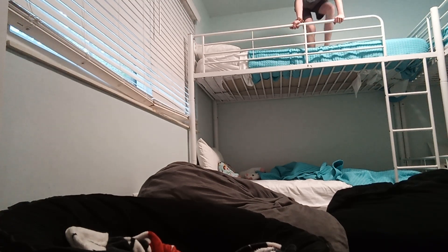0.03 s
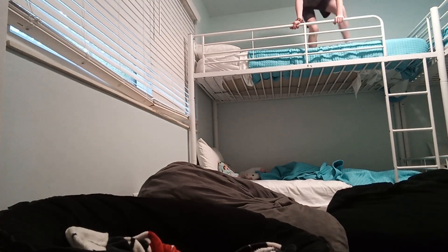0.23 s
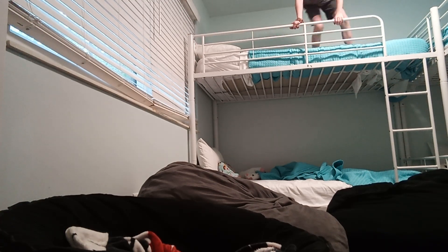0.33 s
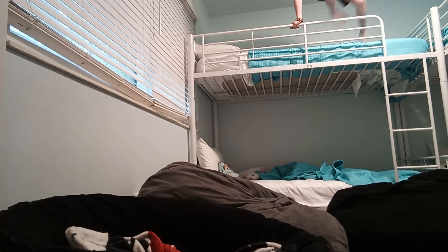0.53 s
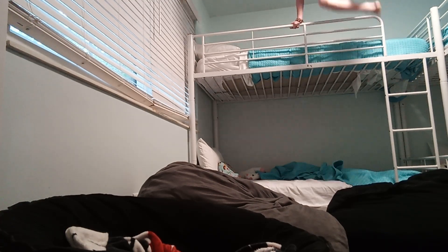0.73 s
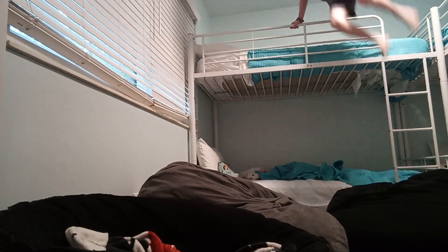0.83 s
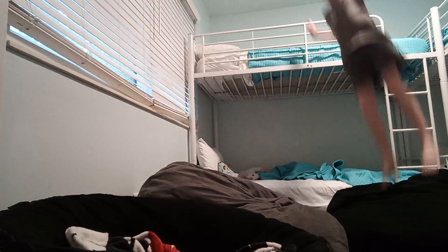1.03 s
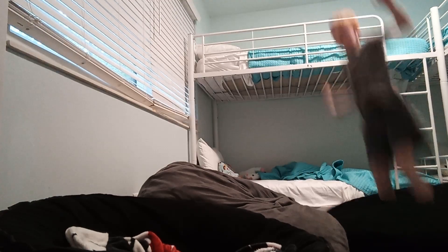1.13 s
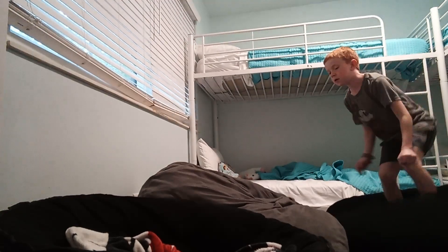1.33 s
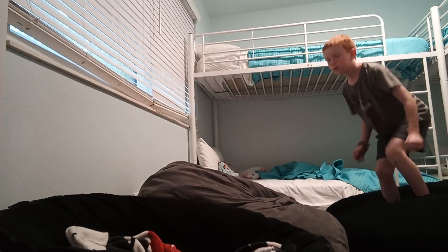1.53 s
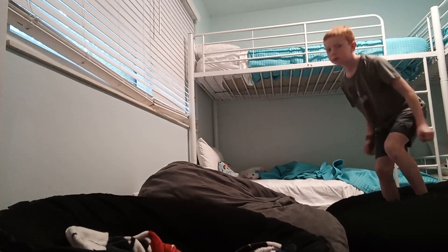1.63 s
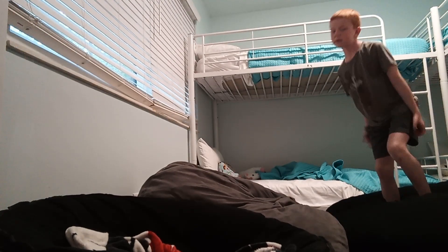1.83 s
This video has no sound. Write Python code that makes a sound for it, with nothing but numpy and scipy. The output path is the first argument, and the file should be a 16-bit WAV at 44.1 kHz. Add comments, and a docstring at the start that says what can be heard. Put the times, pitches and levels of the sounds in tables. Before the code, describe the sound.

Metal bunk bed clacks and rattles as a child jumps off and thumps onto a beanbag

```python
"""A steel bunk bed: a child pushes off the top; slipping joints clack in runs of ticks and ring the tubes.
The bed sways with a low boom and the bedding rustles as noise grains under level curves.
The child lands on a beanbag and shifts on it: soft pulses through resonances thump, the filling crunches,
the floor rumbles, the cover swishes and snaps once (a run of ticks too), narrow noise bands squeak.
A small bedroom answers; a low hum sinks, then partly returns, over faint room tone."""
import sys
import numpy as np
from scipy import signal
from scipy.fft import rfft, irfft, next_fast_len
from scipy.io import wavfile

SR = 44100
rng = np.random.default_rng(int(sys.argv[2]) if len(sys.argv) > 2 else 0)


def digitize_waveform(pressure):
    """Quantize a signal to 16-bit integers and store it at the path in sys.argv[1].

    Rows of a 2-D input are taken as channels; values are limited to [-1, 1].
    """
    field = np.atleast_2d(pressure).T
    bounded = np.clip(field, -1, 1)
    quanta = np.round(bounded * 32767).astype(np.int16)
    wavfile.write(sys.argv[1], SR, quanta)


N = 83790

BODY_WET_DB, TREBLE_WET_DB = 9.5, 5  # reverberation against direct clack
BODY_BLOOM_S = 0.0028  # the lower part of a clack arrives mostly by way of the walls


def amp(db):
    """Decibels to gain."""
    return 10 ** (np.asarray(db) / 20)


def unit(x):
    """Scale to rms 1."""
    return x / np.sqrt(np.mean(x ** 2) + 1e-20)


def burst(x):
    """Scale to the energy of 20 ms at rms 1."""
    return x * np.sqrt(SR / 50 / (np.sum(x ** 2) + 1e-20))


def clock():
    """Time of each sample [s]."""
    return np.arange(N) / SR


def along(points, hz):
    """Interpolate (frequency [Hz], value) points on a log frequency axis."""
    point_hz, values = np.transpose(points)
    return np.interp(np.log(hz + 1), np.log(point_hz + 1), values)


def level(points):
    """Gain per sample from (time [s], level [dB]) points."""
    return amp(np.interp(clock(), *np.transpose(points)))


def filtered(x, response):
    """Multiply the spectrum of x by a response of frequency [Hz]."""
    size = 2 * next_fast_len(N * 3 // 4)  # zero-padded against wrap-around
    spectrum = rfft(x, size) * response(np.fft.rfftfreq(size, 1 / SR))
    return irfft(spectrum, size)[:N]


def colour(x, points):
    """Minimum-phase filter through (frequency [Hz], gain [dB]) points."""
    def response(hz):
        cepstrum = irfft(np.log(amp(along(points, hz))))
        half = len(cepstrum) // 2
        cepstrum[1:half] *= 2  # fold to the causal side
        cepstrum[half + 1:] = 0
        return np.exp(rfft(cepstrum))
    return filtered(x, response)


def resonate(x, peaks):
    """Parallel resonances (frequency [Hz], width [Hz], gain [dB])."""
    def response(f):
        return sum(amp(db) * 1j * f * width / (hz * hz - f * f + 1j * f * width)
                   for hz, width, db in peaks)
    return filtered(x, response)


def add(out, start_s, x):
    """Mix x in from start_s."""
    part = out[round(start_s * SR):][:len(x)]
    part += x[:len(part)]


def grains(per_s, spread_db, size=N):
    """Random tiny slips of uneven size, rms 1."""
    hits = rng.random(size) < per_s / SR
    sizes = rng.standard_normal(size) * amp(spread_db * rng.standard_normal(size))
    return unit(hits * sizes)


def swell(peak_s, rise_s, t60_s):
    """Rise by 20 dB in rise_s up to peak_s, then decay by 60 dB per t60_s."""
    t = clock() - peak_s
    return amp(np.minimum(20 * t / rise_s, -60 * t / t60_s))


def clacks():
    """Joints slip, and at 1.252 s the bag's cover snaps: tick runs with knock, resonances and tube ring."""
    # joint slips, and at 1.252 s a snap of the bag's cover: (time [s], level before part gains [dB],
    # treble against body [dB], decay constant of the ticks [s], knock pitch [Hz])
    clack_rows = [(0.2143, -28.5, 2, 0.0036, 3030), (0.382, -39.5, 1, 0.0095, 3300),
                  (0.3872, -41, 10.5, 0.0017, 3260), (0.6237, -32, 3.5, .004, 3290),
                  (0.836, -53, -9.5, 0.0033, 2370), (0.883, -49.5, 6.5, 0.012, 3250),
                  (.964, -53.5, -5.5, 0.011, 1750), (1.12, -62, 9, .008, 2690),
                  (1.252, -53, 8, 0.0055, 2660), (1.36, -71.5, 11.5, 0.013, 3000)]
    # spectra of the clack's lower and upper parts: (frequency [Hz], gain [dB])
    body_shape = [(300, -28), (750, -12), (1400, -5), (2050, -4), (2450, -5), (3100, 1), (4200, -4),
                  (5800, -6), (8000, -22.5), (16000, -16)]
    treble_shape = [(3000, -22.5), (6000, -7.5), (7700, -3.5), (9000, -8), (10300, 2), (12000, -5.5),
                    (15800, -13)]
    # joint resonances: (frequency [Hz], width [Hz], gain [dB])
    joint_peaks = [(1570, 20, -9), (2727, 22, -7), (3025, 60, -4), (3600, 25, -7), (6738, 30, -6),
                   (7455, 60, -2), (7850, 70, 1), (8588, 45, -2), (8815, 70, -6), (9225, 110, -4),
                   (9470, 90, -4)]
    body_db, treble_db, joint_db, tube_db, knock_db = -8.5, -9.5, -8, -19.5, -8
    knock_width_hz = 900

    body, treble, steel = np.zeros((3, N))
    tubes = amp(tube_db) * ring()
    for start_s, db, tilt_db, decay_s, knock_hz in clack_rows:
        low, high = amp(db - tilt_db / 2), amp(db + tilt_db / 2)
        add(body, start_s, low * tick_run(decay_s, BODY_WET_DB, BODY_BLOOM_S))
        add(treble, start_s, high * tick_run(decay_s, TREBLE_WET_DB, decay_s / 2))
        peak = signal.iirpeak(knock_hz, knock_hz / knock_width_hz, SR)
        knock = signal.lfilter(*peak, tick_run(decay_s, BODY_WET_DB, decay_s))
        add(steel, start_s, low * amp(knock_db) * burst(knock))
        add(steel, start_s, low * tubes)

    # each filtered part keeps the rms of its drive, times its gain
    low_part = amp(body_db) * unit(colour(body, body_shape)) * body.std()
    high_part = amp(treble_db) * unit(colour(treble, treble_shape)) * treble.std()
    clink = amp(joint_db) * unit(resonate(treble, joint_peaks)) * treble.std()
    return low_part + high_part + clink + steel


def tick_run(decay_s, wet_db, build_s):
    """A quick decaying run of ticks, its reverberation and the buzz of loose parts."""
    rattle_db, rattle_t60_s = -28, 0.32
    t = np.arange(SR // 2) / SR
    out = burst(grains(per_s=3800, spread_db=1, size=len(t)) * np.exp(-t / decay_s))
    add(out, 0, amp(wet_db) * burst(tail(build_s)))
    rattle = rng.standard_normal(len(t)) * amp(-60 * t / rattle_t60_s)
    return burst(out) + amp(rattle_db) * burst(rattle)


def ring():
    """The tubes' modes after one blow: decaying sines with a soft onset."""
    # tube modes: (frequency [Hz], level before tube gain [dB], t60 [s])
    tube_modes = [(790, -12, .35), (1348, -4, .6), (1569, 1, .28), (1680, -10, .5), (1836, -3, .25),
                  (2030, 0, .2), (2191, 0, .4), (2730, 1, .22), (2961, -1, .33), (3321, -9, .6),
                  (3595, 0, .35), (4300, -9, .33), (5535, -9, .65)]
    t = np.arange(SR) / SR
    modes = sum(amp(db - 60 * t / t60_s) * np.sin(2 * np.pi * (hz * t + rng.random()))
                for hz, db, t60_s in tube_modes)
    return modes * (1 - np.exp(-t / BODY_BLOOM_S))


def sway():
    """Each shift of weight rocks the whole bed on its feet with a low boom."""
    # shifts of weight: (time [s], level [dB])
    shifts = [(0.468, -60.5), (0.647, -60.5), (.83, -64)]
    sway_hz, rise_s, t60_s = 74, 0.03, 0.38
    t = clock()
    return sum(amp(db) * swell(s, rise_s, t60_s) * np.sqrt(2) * np.sin(2 * np.pi * sway_hz * (t - s))
               for s, db in shifts)


def thumps():
    """Feet and body push into the bag, each with one soft pulse through its resonances."""
    # pushes: (time [s], level before thump gain [dB], pulse length [s])
    pushes = [(1.12, -33, .0042), (1.127, -41.5, 0.0019), (1.1505, -30.5, 0.0029), (1.1597, -40.5, 0.0027),
              (1.168, -38.5, 0.00287), (1.1778, -42.5, 0.0039), (1.223, -54.5, 0.0052),
              (1.25, -47.5, 0.0046), (1.304, -68, 0.016), (1.382, -55.5, 0.0072), (1.476, -52, 0.0038)]
    # bag and floor: (frequency [Hz], width [Hz], gain [dB])
    bag_peaks = [(84.5, 13, -14), (121.3, 28, -4.5), (158.8, 40, 3.5), (223.6, 76, 3.5), (301, 79, -3),
                 (566, 46, -2), (705, 50, -16), (1010, 200, -25)]
    thump_db = -1.5
    t, out = clock(), np.zeros(N)
    for start_s, db, push_s in pushes:
        pulse = np.sin(np.pi * np.minimum(t / push_s, 1)) ** 2
        add(out, start_s, amp(db) * burst(resonate(pulse, bag_peaks)))
    return amp(thump_db) * room(out, wet_db=-4.5)


def filling():
    """Beads give way in grains under the load; the floor rumbles as swelling noise."""
    # pressure peaks: (time [s], level [dB], rise [s], t60 [s])
    crunches = [(1.122, -37.5, 0.028, 0.31), (1.227, -54.5, 0.052, 0.12), (1.565, -64.5, 0.081, 0.35)]
    # spectra of beads and floor: (frequency [Hz], gain [dB])
    bead_shape = [(25, -12), (60, -5.5), (150, -3.5), (280, 7), (420, -3.5), (620, 2), (850, -5),
                  (1200, -8), (2000, -25), (4000, -33), (9000, -55)]
    rumble_shape = [(20, -27), (37, 0), (60, -7), (115, -5.5), (180, -12.5), (400, -24.5), (1000, -39)]
    sag_s, sag_db, sag_rise_s, sag_t60_s = 1.218, -49, 0.18, 0.88

    pressure = sum(amp(db) * swell(s, rise_s, t60_s) for s, db, rise_s, t60_s in crunches)
    beads = pressure * unit(colour(grains(per_s=3100, spread_db=1.5), bead_shape))
    load = amp(sag_db) * swell(sag_s, sag_rise_s, sag_t60_s)
    rumble = load * unit(colour(rng.standard_normal(N), rumble_shape))
    return beads + rumble


def fabrics():
    """Mattress and clothes rub during the push-off, the bag's cover at the landing: dense grains."""
    # mattress and clothes, then cover: (time [s], level [dB])
    bedding_level = [(0, -88), (.1, -72), (.19, -74), (.35, -54.5), (.42, -55), (.47, -50), (.525, -61.5),
                     (.575, -50), (.62, -71), (.82, -105), (.86, -72.5), (1.0, -59.5), (1.08, -91),
                     (1.25, -100)]
    cover_level = [(1.08, -60.5), (1.125, -50), (1.17, -53), (1.225, -49), (1.27, -67.5), (1.32, -68.5),
                   (1.45, -68.5), (1.6, -68.5), (1.78, -72.5), (1.89, -67)]
    # their spectra: (frequency [Hz], gain [dB])
    cloth_shape = [(30, -19.5), (75, 7.5), (140, 4.5), (250, -1), (450, -0.5), (900, -4), (3200, -10.5),
                   (5500, -9), (8800, -9.5), (10500, -10.5), (15800, -10)]
    swish_shape = [(300, 6), (1200, 3.5), (2500, 1.5), (4500, -6), (6200, -12), (8900, -7.5), (11000, -12),
                   (15800, -3)]
    bedding = level(bedding_level) * unit(colour(grains(per_s=9000, spread_db=1), cloth_shape))
    cover = level(cover_level) * unit(colour(grains(per_s=5000, spread_db=-2), swish_shape))
    return room(bedding + cover, wet_db=-4)


def squeaks():
    """Rail and cover rub: narrow noise bands of ragged pitch under bell-shaped envelopes."""
    # rubs: (centre time [s], level [dB], pitch [Hz], envelope sigma [s])
    rubs = [(1.0, -63, 1610, 0.072), (1.016, -65.5, 3500, .03), (1.206, -65, 4310, 0.0078),
            (1.23, -56, 1930, 0.0098), (1.242, -55, 2520, 0.011), (1.619, -70.5, 3060, 0.0069)]
    width_hz = 81
    t, out = clock(), np.zeros(N)
    for centre_s, db, hz, sigma_s in rubs:
        tone = unit(resonate(rng.standard_normal(N), [(hz, width_hz, 0)]))
        out += amp(db) * np.exp(-.5 * ((t - centre_s) / sigma_s) ** 2) * tone
    return out


def room(x, wet_db):
    """Direct sound plus reverberation, scaled to about the same energy."""
    wet = signal.fftconvolve(x, tail(build_s=0.00067))[:N]
    return (x + amp(wet_db) * wet) / np.hypot(1, amp(wet_db))


def tail(build_s):
    """Bedroom reverberation: fresh noise decaying per frequency, energy 1, onset constant build_s."""
    # decay: (frequency [Hz], t60 [s])
    room_t60 = [(100, .28), (500, 0.27), (3000, 0.24), (9000, 0.2), (15000, 0.19)]
    hz, t, z = signal.stft(rng.standard_normal(SR // 3), SR, nperseg=256)
    decay = amp(-60 * t / along(room_t60, hz)[:, None])
    x = signal.istft(z * decay, SR, nperseg=256)[1]
    x = x * (1 - np.exp(-np.arange(len(x)) / SR / build_s))
    return x / np.linalg.norm(x)


def background():
    """Room tone as coloured noise, and a low hum as one sine of varying level."""
    # hum: (time [s], level [dB])
    hum_level = [(0, -59.5), (.24, -58), (.35, -66), (.7, -77), (1.5, -69.5), (1.9, -70)]
    # room tone spectrum: (frequency [Hz], gain [dB])
    air_shape = [(20, -19.5), (45, -3), (80, 4.5), (130, 8), (220, -2.5), (400, -7.5), (700, -11),
                 (1300, -17), (3000, -16.5), (4500, -24), (8800, -28), (15800, -25.5)]
    hum_hz, air_db = 108.5, -66.5
    hum = np.sqrt(2) * level(hum_level) * np.sin(2 * np.pi * hum_hz * clock())
    return hum + amp(air_db) * unit(colour(rng.standard_normal(N), air_shape))


def scene():
    """Everything at one microphone."""
    impacts = clacks() + sway() + thumps()
    rubbing = filling() + fabrics() + squeaks()
    return (impacts + rubbing + background())[None]


def record(dry):
    """The microphone rolls off the bass and its port rings in the treble; cut above the band limit."""
    # microphone and port: (frequency [Hz], gain [dB])
    mic_shape = [(22, -12), (36, -2.5), (5500, -3.5), (7500, -1), (8850, 6.5), (10200, -2.5), (12000, -8.5),
                 (15800, -13.5)]
    top_hz = 15900
    return filtered(colour(dry[0], mic_shape), lambda hz: hz < top_hz)[None]


dry = scene()
out = record(dry)
digitize_waveform(out)
```